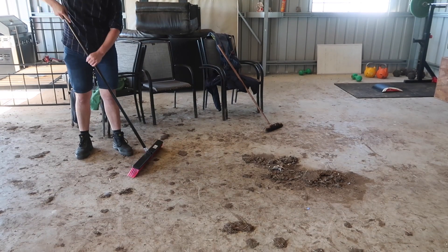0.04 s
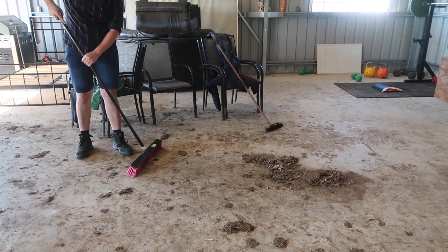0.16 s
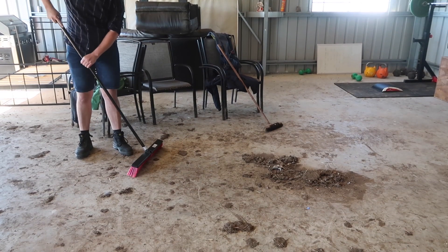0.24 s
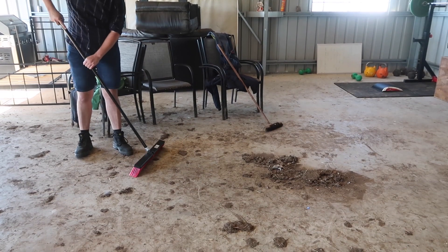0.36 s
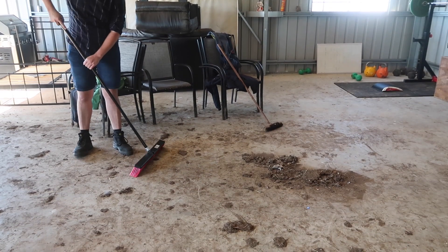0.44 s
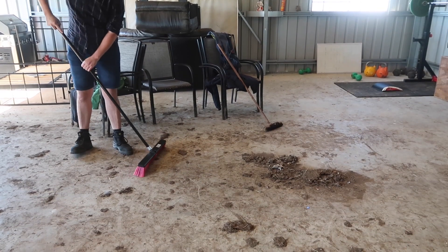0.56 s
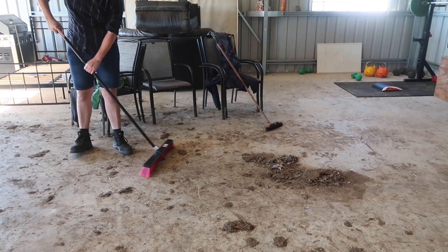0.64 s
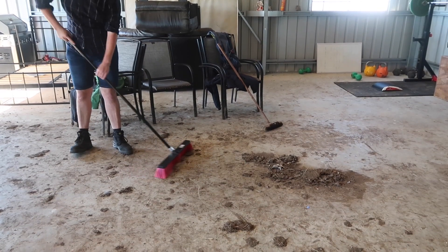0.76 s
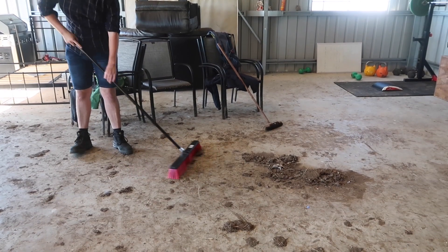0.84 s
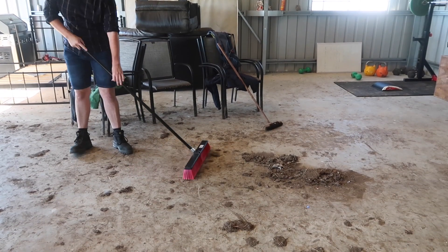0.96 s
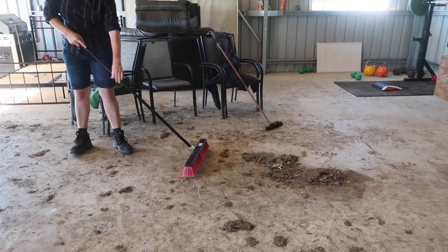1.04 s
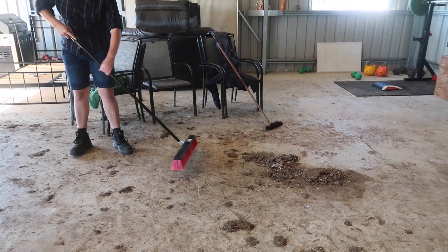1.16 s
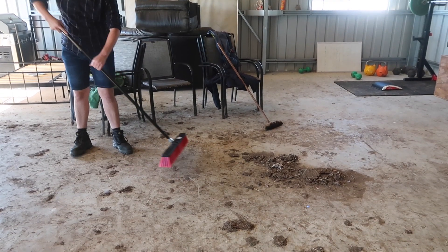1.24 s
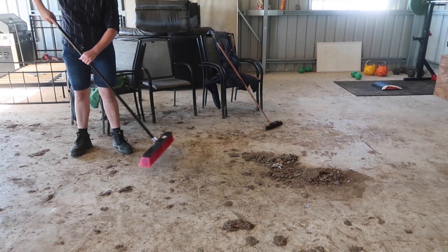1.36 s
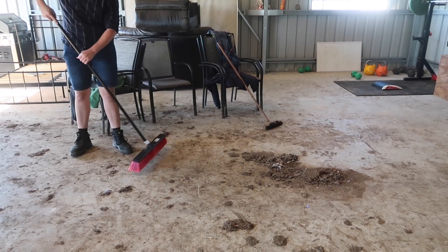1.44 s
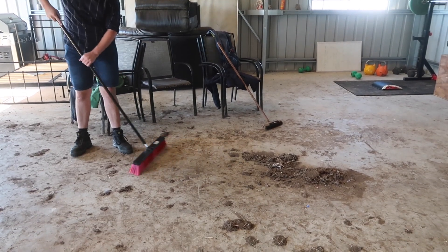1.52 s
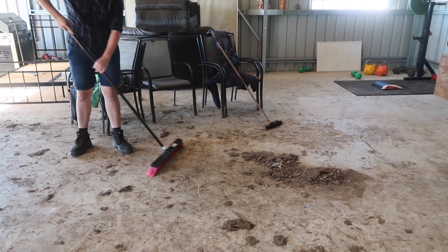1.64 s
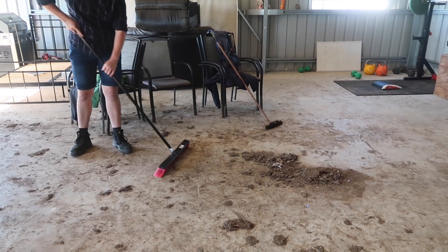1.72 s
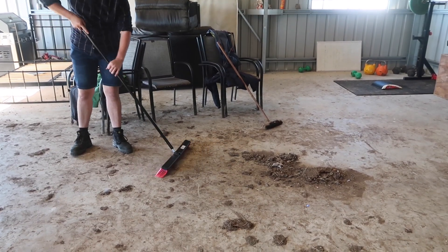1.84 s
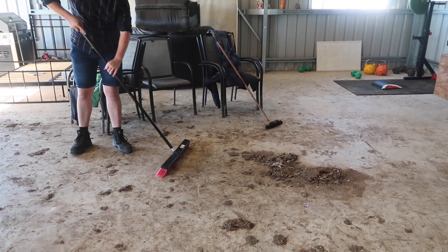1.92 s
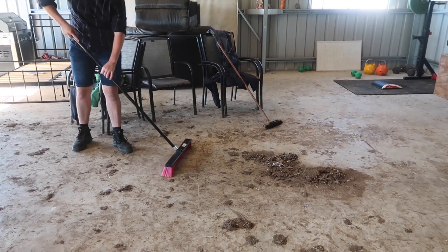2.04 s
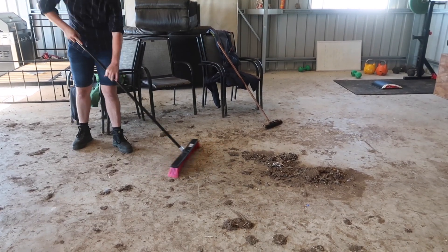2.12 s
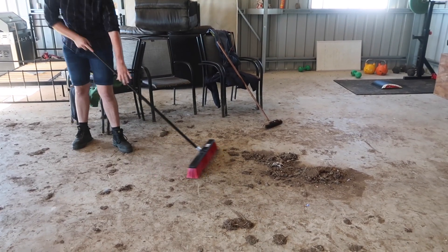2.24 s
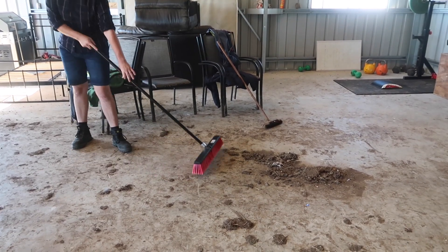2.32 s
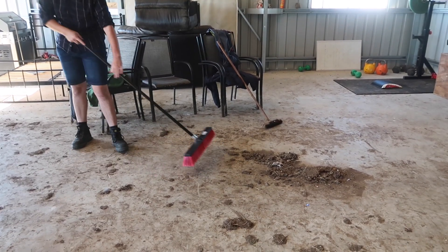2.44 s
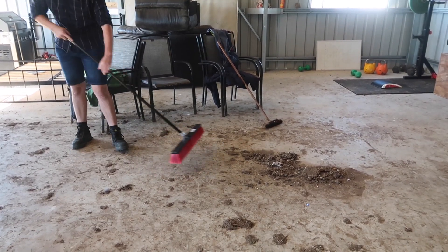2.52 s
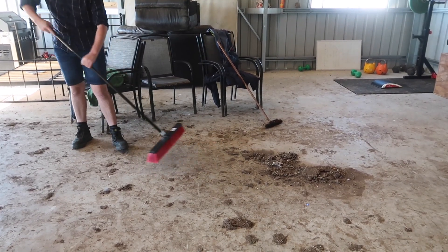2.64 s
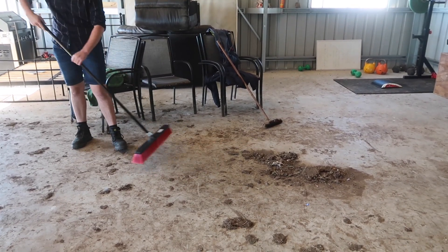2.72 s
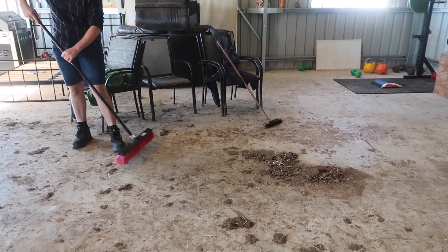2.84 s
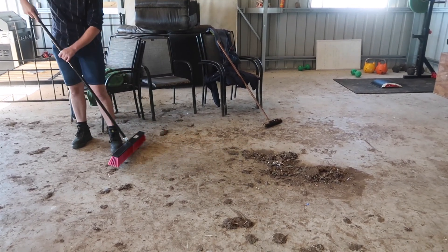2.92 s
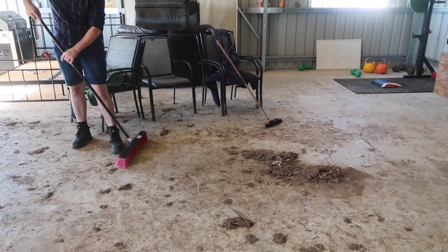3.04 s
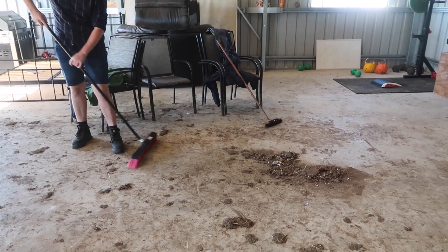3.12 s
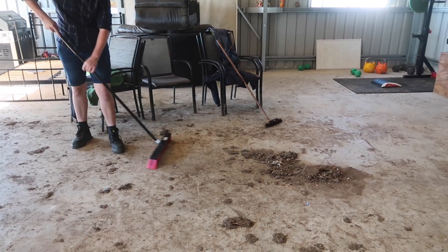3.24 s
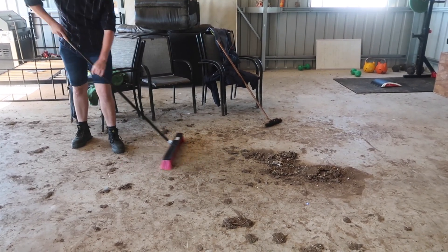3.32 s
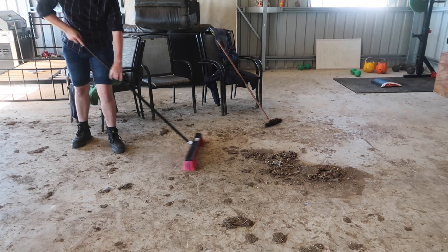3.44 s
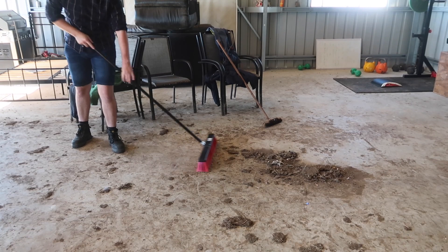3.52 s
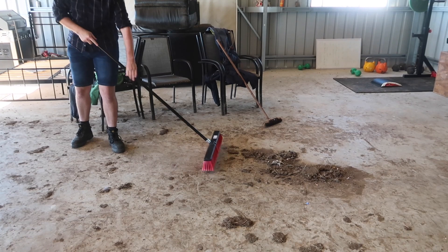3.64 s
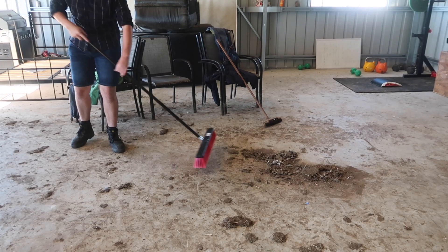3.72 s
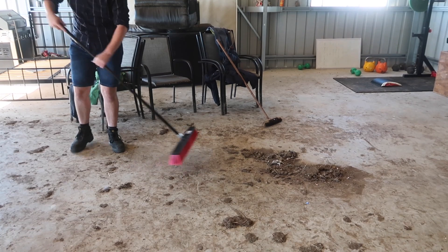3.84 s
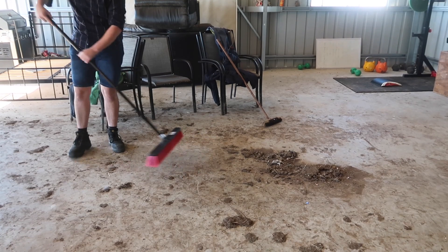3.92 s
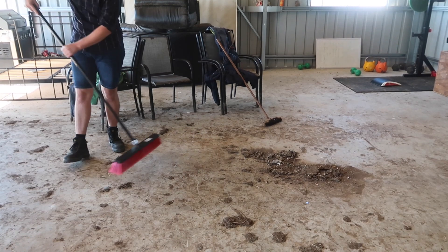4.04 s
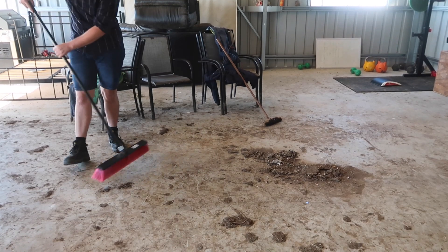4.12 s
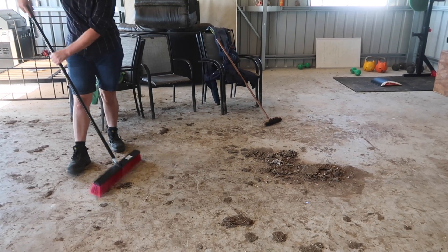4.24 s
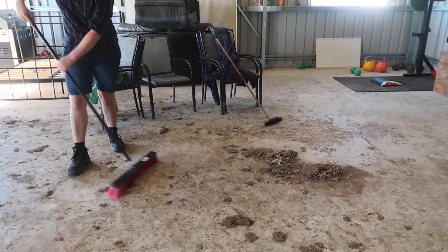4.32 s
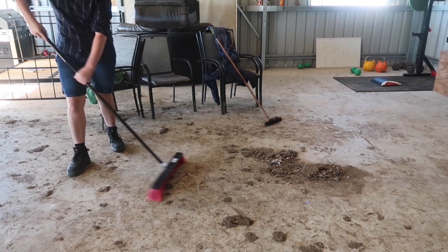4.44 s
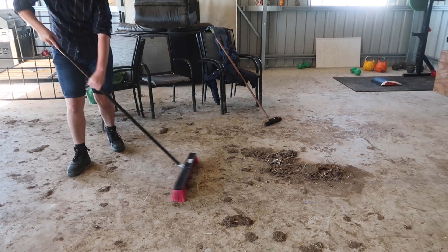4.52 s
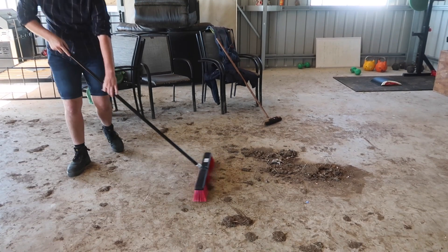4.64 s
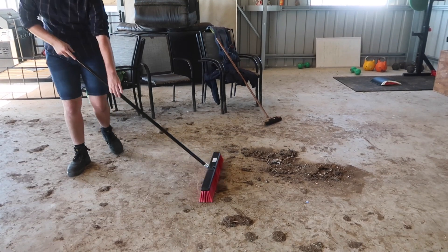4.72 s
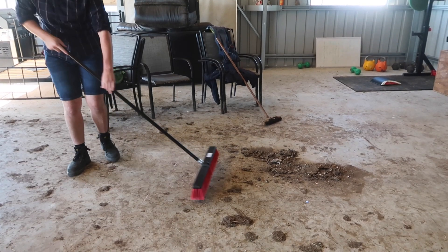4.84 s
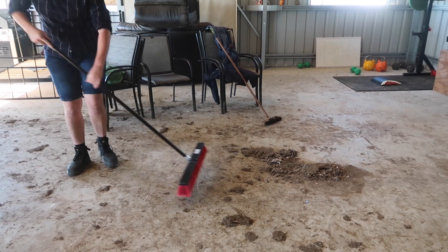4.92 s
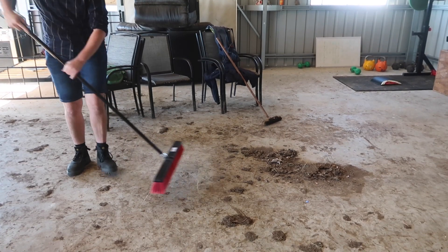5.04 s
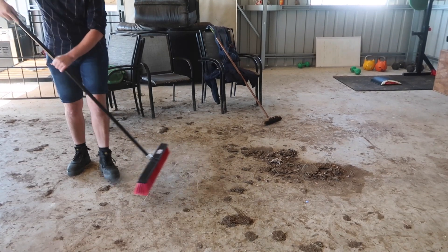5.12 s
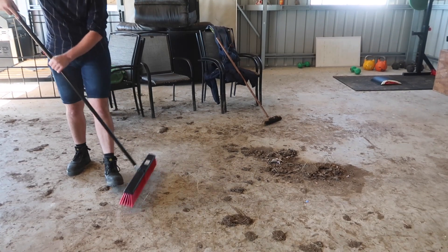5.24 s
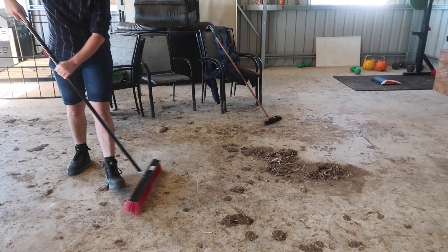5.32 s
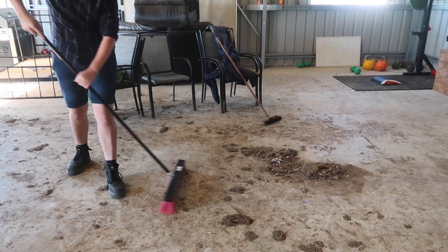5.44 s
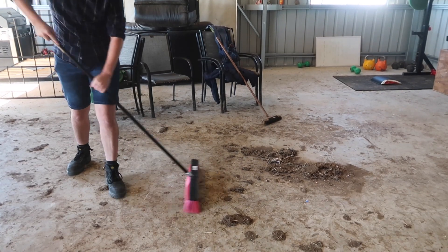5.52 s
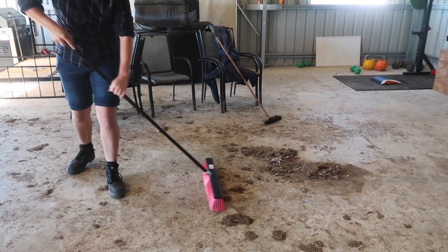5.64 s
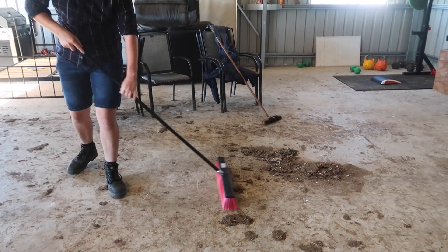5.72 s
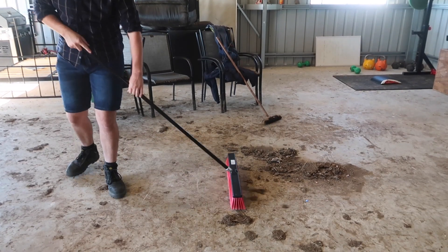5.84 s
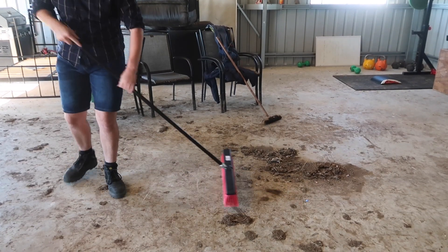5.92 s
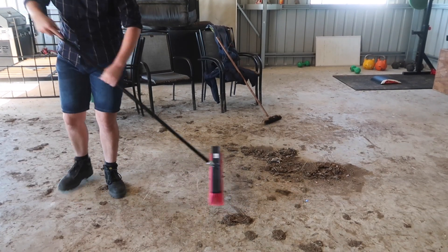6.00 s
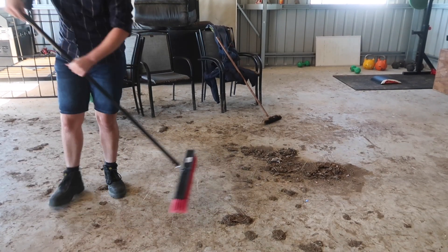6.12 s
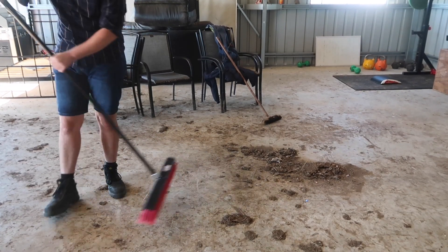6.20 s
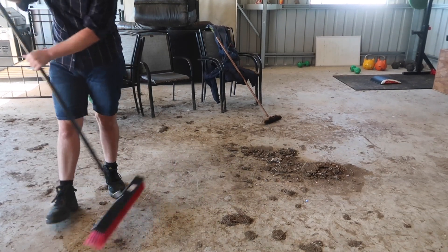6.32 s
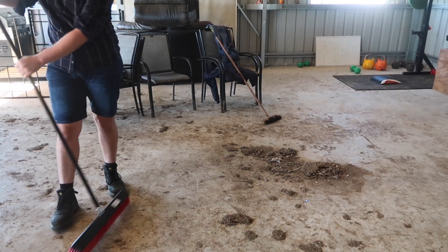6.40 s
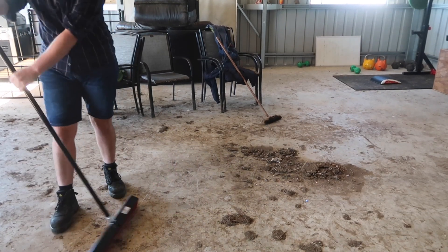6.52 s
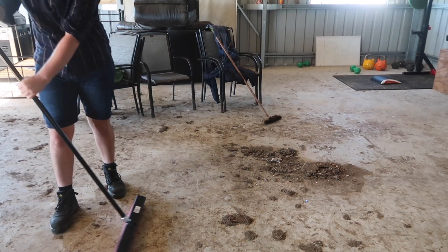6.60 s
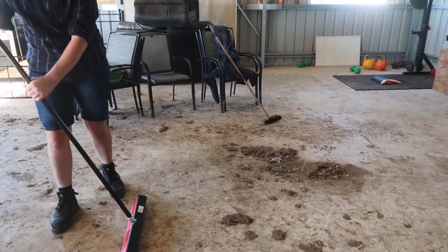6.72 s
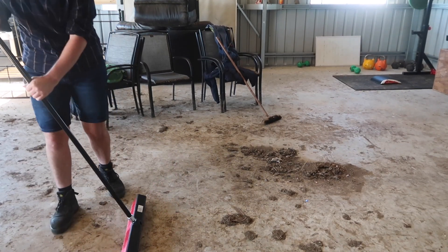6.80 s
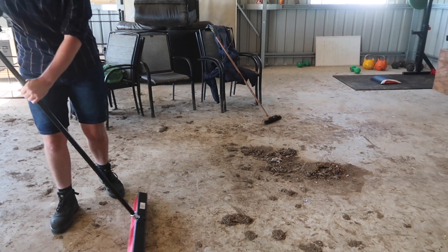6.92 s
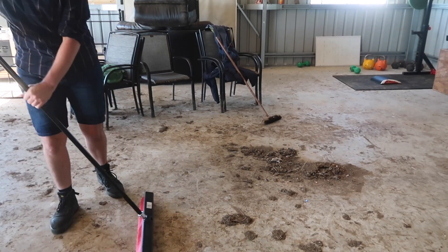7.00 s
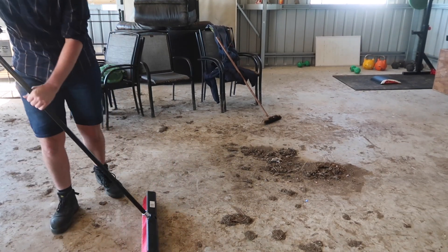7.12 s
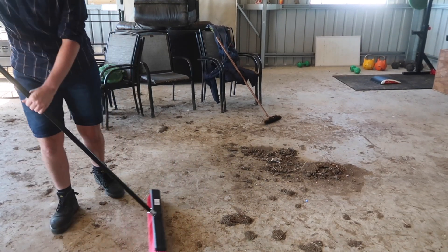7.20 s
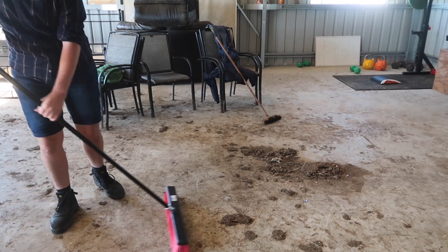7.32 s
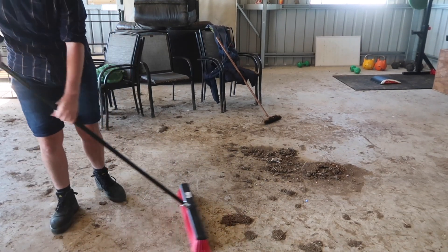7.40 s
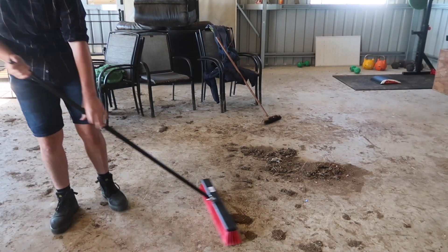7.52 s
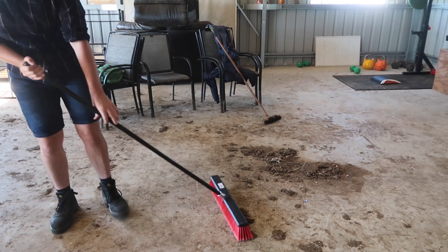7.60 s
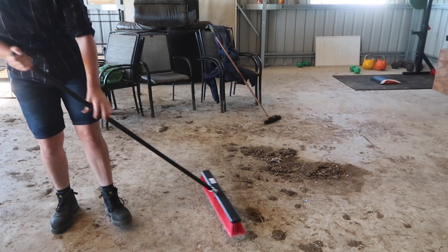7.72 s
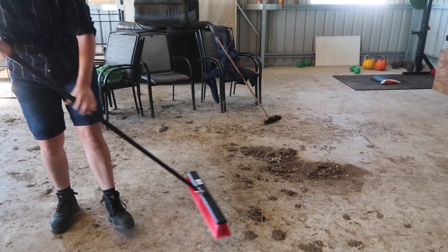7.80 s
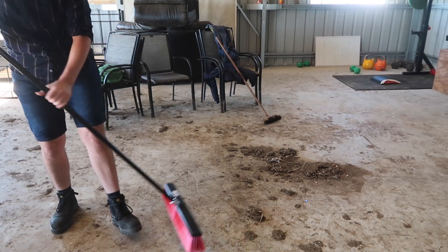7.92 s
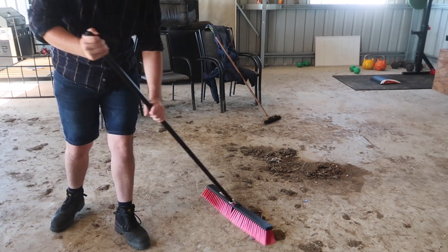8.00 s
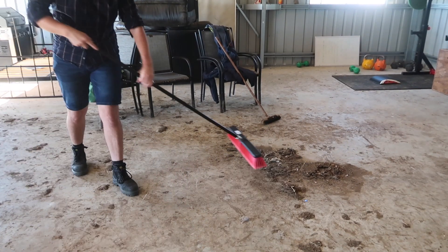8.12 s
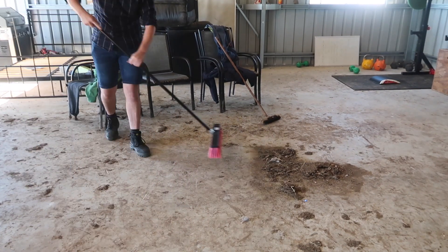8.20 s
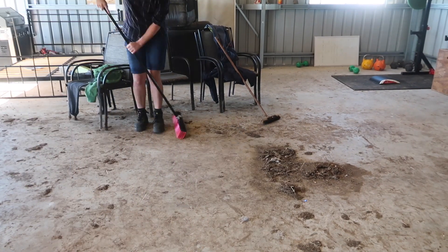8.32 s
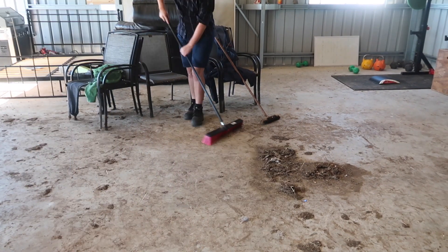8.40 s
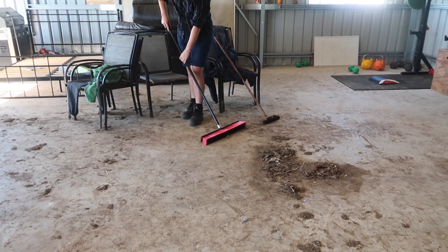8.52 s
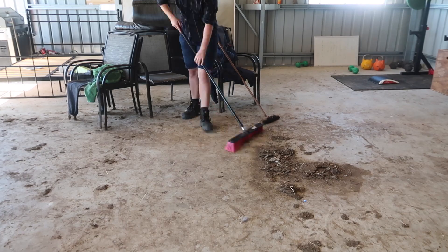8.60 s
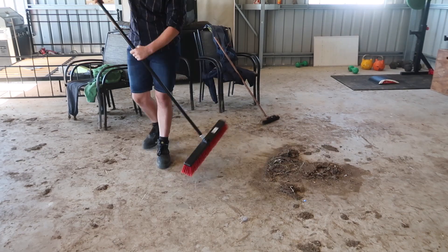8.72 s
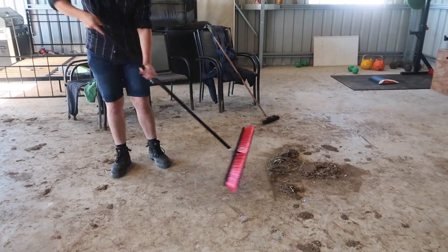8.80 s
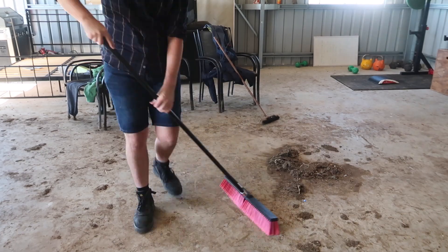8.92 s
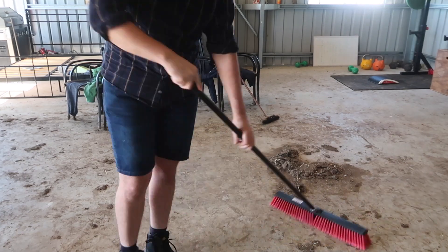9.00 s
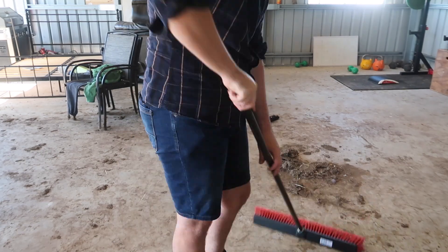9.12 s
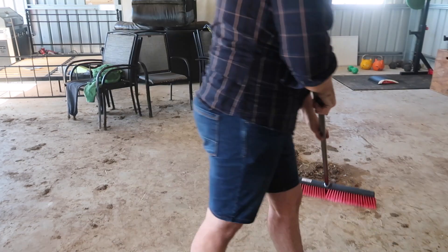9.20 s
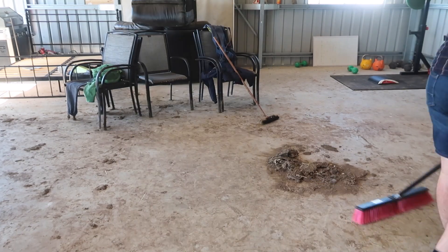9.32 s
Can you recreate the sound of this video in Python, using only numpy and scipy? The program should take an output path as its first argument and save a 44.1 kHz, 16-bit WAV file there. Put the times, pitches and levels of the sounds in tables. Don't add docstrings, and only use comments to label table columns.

```python
import sys
import numpy as np
from scipy import signal
from scipy.fft import rfft, irfft
from scipy.io import wavfile
from scipy.ndimage import uniform_filter1d

SR = 44100
rng = np.random.default_rng(int(sys.argv[2]) if len(sys.argv) > 2 else 0)


def undo_db(level):
    steps = np.asarray(level, float) / 20
    return 10 ** steps


def wrap_up_sound(samples):
    columns = np.atleast_2d(samples).T
    tamed = np.clip(columns, -1, 1)
    steps = np.round(tamed * 32767).astype(np.int16)
    wavfile.write(sys.argv[1], SR, steps)


N = 412731
FAST_FROM_S = 8.0


def rms_one(x):
    return x / np.sqrt(np.mean(x ** 2) + 1e-20)


def at_hz(points, hz):
    table_hz, values = np.transpose(points)
    return np.interp(np.log(hz + 1), np.log(table_hz), values)


def colour(x, spectrum):
    size = 8192
    bins_hz = np.arange(size // 2 + 1) * SR / size
    cepstrum = irfft(np.log(undo_db(at_hz(spectrum, bins_hz))))
    cepstrum[1:size // 2] *= 2
    cepstrum[size // 2 + 1:] = 0
    response = irfft(np.exp(rfft(cepstrum)))
    return rms_one(signal.oaconvolve(x, response)[:N])


def drift(rate):
    r = np.exp(-80 * np.pi * rate / SR)
    chance = rng.standard_normal(N // 40 + 2002)
    slow = signal.lfilter([1], [1, -2 * r, r * r], chance)[2000:]
    return np.interp(np.arange(N) / 40, np.arange(len(slow)), rms_one(slow))


def ring(x, hz, t60):
    r, w = undo_db(-60 / (t60 * SR)), 2 * np.pi * hz / SR
    return signal.lfilter([0, np.sin(w)], [1, -2 * r * np.cos(w), r * r], x + 1e-18)


def place(out, sound, at, peak_db):
    out[at:at + len(sound)] += undo_db(peak_db) * sound / np.abs(sound).max()


def sweeping():
    bristle_db, bright_db, head_db, body_db, deep_db = controls()
    springy = np.clip((bright_db + 21.) / 11.2, 0, 1)
    heavy_head = np.clip((head_db - bristle_db + 5.5) / 9.2, 0, 1)
    heavy_body = np.clip((body_db + 43.0) / 6.0, 0, 1)
    gains = undo_db([bristle_db, bristle_db + bright_db, head_db, body_db - 3.5, deep_db - 0.5])
    bristle, hiss, head, body, deep = uniform_filter1d(gains, size=30, axis=1)
    front, side = bristles(bristle, hiss, springy)
    front += head * wooden_head(heavy_head)
    front += body * handle(heavy_body)
    front += deep * deep_rumble()
    return front, side


def flicks(per_s, spread_db, clump_db):
    sizes = undo_db(spread_db * np.minimum(rng.exponential(1, N), 5)) * rng.choice([-1, 1], N)
    lets_go = rng.random(N) < per_s / SR
    return sizes * lets_go * undo_db(clump_db * drift(18.6))


# pitch_hz, level_db (per Hz)
FLICK_TONE = [(900, -41), (1300, -7), (1700, -3.5), (3100, 1.5), (4000, -1.5), (4700, -2), (5800, -12),
              (7500, -29.5), (12000, -69.5)]
# pitch_hz, level_db (per Hz)
DRAG_TONE = [(900, -36.5), (1400, -13), (1650, 5.5), (2600, 3.5), (3300, -1.5), (4200, -12.5), (6000, -42),
             (12000, -70)]
# pitch_hz, level_db (per Hz)
HISS_TONE = [(3500, -25), (5600, -3.5), (6500, -2.5), (8000, -4), (10500, -7.5), (13000, -13), (15500, -17),
             (16500, -56)]
# pitch_hz, level_db (per Hz)
SIDE_HISS_TONE = [(100, -44), (400, -36), (900, -41), (2200, -46), (3300, 2.5), (4700, 8.5), (7500, 4),
                  (11500, 5.5), (15500, -3.5), (16500, -66)]


def bristles(bristle, hiss, springy):
    near, flat, far = flicks(11000., 1.67, 0.92), flicks(9000., 4.2, 0.99), flicks(14000., 2.9, 0.84)
    upright = colour(near, FLICK_TONE) + singing(far)
    dragged = colour(flat, DRAG_TONE)
    front = bristle * (np.sqrt(springy) * upright + np.sqrt(1 - springy) * dragged)
    front += undo_db(-0.2) * hiss * colour(near, HISS_TONE)
    return front, undo_db(5.0) * hiss * colour(far, SIDE_HISS_TONE)


# start_s, end_s
PUSH_SPANS = [
    (0, 1.556),
    (1.557, 3.021),
    (3.022, 4.292),
    (4.293, 5.298),
    (5.299, 6.485),
    (6.486, 7.14),
    (7.141, 8),
]
# pitch_hz, share_db
PUSH_PITCHES = [(3260, -15), (3300, -17), (3170, -11.5), (3070, -25), (3440, -28), (2600, -21),
                (3500, -4.5)]


def singing(x):
    out = np.zeros(N)
    for (start, end), (hz, share_db) in zip(PUSH_SPANS, PUSH_PITCHES):
        span = slice(round(start * SR), round(end * SR))
        sung = ring(ring(x[span], hz, 12. / hz), hz, 12. / hz)
        out[span] = undo_db(share_db) * rms_one(sung)
    return out


# pitch_hz, level_db (per Hz)
RATTLE_TONE = [(250, -21), (420, -6), (600, 0), (900, -1), (1250, 5), (1600, -5.5), (2400, -17),
               (6000, -58)]
# pitch_hz, level_db (per Hz)
KNOCK_TONE = [(250, -13.5), (420, -2.5), (800, -4.5), (1500, -5.5), (6000, -73)]


def wooden_head(heavy):
    rattle = flicks(3000., 2.1, 0.44)
    return (1 - heavy) * colour(rattle, RATTLE_TONE) + heavy * colour(rattle, KNOCK_TONE)


# pitch_hz, level_db (per Hz)
WOOD_TONE = [(60, -33), (130, -13.5), (180, -8), (215, -5), (255, 1.5), (300, 0), (420, -1), (700, -31),
             (3000, -97)]
# pitch_hz, level_db (per Hz)
SLAM_TONE = [(60, -30), (120, -5), (230, 0.5), (400, -1.5), (700, -13.5), (1500, -69)]
# pitch_hz, width_hz, level_db
HANDLE_BENDS = [
    (221, 43, -3.5),
    (293, 160, -6.5),
]


def handle(heavy):
    bend_share = 0.57
    shake = flicks(1500., 1.7, 1.9)
    wood = colour(shake, WOOD_TONE)
    bends = 0
    for hz, width, db in HANDLE_BENDS:
        bends = bends + undo_db(db) * rms_one(ring(wood, hz, 2.0 / max(width, 12)))
    hum = bend_share * rms_one(bends) + (1 - bend_share) * wood
    return (1 - heavy) * rms_one(hum) + heavy * colour(shake, SLAM_TONE)


# pitch_hz, level_db (per Hz)
RUMBLE_TONE = [(15, -18), (40, -6.5), (70, -7), (95, -2.5), (120, -5.5), (160, -9.5), (1000, -110)]


def deep_rumble():
    return colour(rng.standard_normal(N), RUMBLE_TONE)


def controls():
    t = np.arange(N) / SR
    coarse = t[::32]
    smooth = [np.interp(t, coarse, row) for row in 10 * np.log10(slow_work(coarse))]
    held = 10 * np.log10(quick_work())
    deep_db = np.minimum(held[3] - 2.5, -48.) + 0.5 * (held[3] + 52)
    bristle_db, hiss_db, *low = np.where(t < FAST_FROM_S, smooth, [*held, deep_db])
    return bristle_db, hiss_db - bristle_db, *low


def swell(t, start, full, lift, level_db, rise_db, gain_db_per_s, loss_db_per_s):
    rise = np.clip((full - t) / max(full - start, 1e-3), 0, 4)
    db = level_db - rise_db * rise ** 1.04 - gain_db_per_s * np.clip(lift - t, 0, lift - full)
    return undo_db(2 * (db - np.multiply.outer(loss_db_per_s, np.maximum(t - lift, 0))))


# level_db of bristles, hiss, head, handle
REST_LEVELS = [-67.5, -80.5, -65.5, -70]
# time_s, level_db
TRAFFIC_SWELL = [(0.0, -72), (.6, -71), (2.0, -71.5), (3.0, -74.5), (3.7, -71), (3.9, -63.5), (4.3, -64),
                 (5.1, -68), (5.28, -58), (6.4, -62), (8.0, -60)]


def slow_work(t):
    traffic_db = np.interp(t, *np.transpose(TRAFFIC_SWELL))
    power = undo_db(2 * np.array([*[db + 0 * t for db in REST_LEVELS], traffic_db]))
    power[:3] += pushes(t) + landings(t)
    power[2:] += hums(t)
    return power


# touch_s, full_speed_s, lift_s, level_db (at lift), brightness_db
STROKES = [(-.19, -.1, 0.018, -47, -14.5), (0.192, 0.343, 0.35, -50, -12.5), (0.53, 0.71, 0.96, -32, -9.5),
           (1.556, 1.713, 1.744, -33.5, -8.5), (1.966, 2, 1.96, -38, -19),
           (2.05, 2.089, 2.206, -28.5, -18.5), (2.14, 2.242, 2.264, -34.5, -6),
           (2.837, 2.857, 2.2, -56, -30), (3.093, 3.218, 3.555, -30.5, -7.5),
           (4.27, 4.46, 4.7, -29.5, -9.5), (5.304, 5.53, 5.782, -31, -8.5), (6.513, 6.636, 6.7, -37, -8.5),
           (6.79, 6.848, 6.92, -47.5, -32), (6.86, 6.962, 7.075, -41.5, -11),
           (7.077, 7.367, 7.59, -32, -10.5)]
# loss_db_per_s of bristles, hiss, head
LIFT_LOSSES = [88.5, 97, 70]


def pushes(t):
    rise_db, lean_db_per_s, rounding_s = 20, 6.5, 0.059
    dust_db, dust_loss_db_per_s = [[-23], [-27], [-23]], 38
    pushed = np.zeros((3, len(t)))
    for touch, full, lift, level_db, bright_db in STROKES:
        head_db = -15 - 0.32 * (bright_db + 7)
        shares = undo_db(2 * np.array([[0], [bright_db], [head_db]]))
        shape = swell(t, touch, full, lift, level_db, rise_db, lean_db_per_s, LIFT_LOSSES)
        dust = swell(t, full, lift, lift, level_db, rise_db, 0, dust_loss_db_per_s)
        down = min([s for s, *rest in SET_DOWNS if full - .25 < s < full], default=-1)
        audible = t > down + rounding_s / 2
        pushed += audible * shares * (shape + undo_db(2 * np.array(dust_db)) * dust)
    return uniform_filter1d(pushed, round(rounding_s / (t[1] - t[0])), axis=1)


CRUSH_BRIGHT_DB = -19
# start_s, bristle_db, head_db, loss_db_per_s
SET_DOWNS = [(-.2, -72, -48, 17), (2.866, -69, -53.5, 18), (7.47, -60, -44.5, 57), (1.556, -32, -34.5, 123),
             (3.022, -40, -47, 150), (3.04, -43.5, -42, 66), (4.294, -37, -38, 502), (4.317, -38, -36, 102),
             (5.3, -42, -33, 49), (5.355, -31, -29, 82), (6.485, -32.5, -35.5, 105), (6.503, -32, -29, 597),
             (6.42, -58, -53.5, 150.5), (6.82, -53, -49, 57)]


def landings(t):
    crush_s = 0.0034
    power = np.zeros((3, len(t)))
    for s, bristle_db, head_db, dying in SET_DOWNS:
        shares = undo_db(2 * np.array([[bristle_db], [bristle_db + CRUSH_BRIGHT_DB], [head_db]]))
        power += shares * swell(t, s, s + crush_s, s + crush_s, 0, 26, 0, dying) * (t >= s)
    return power


# start_s, rise_s, level_db, loss_db_per_s, deep_share_db
LOADS = [(.05, 0.06, -67, 40, -9), (.54, 0.027, -54, 200, -20), (.665, 0.007, -43.5, 29, -34),
         (1.558, 0.0036, -41, 65, -29), (2.07, 0.027, -47, 27, -18), (3.022, .003, -55, 48, -9),
         (3.61, .02, -60, 120, -11), (4.315, 0.024, -35.5, 280, -23), (4.37, .02, -54, 15, -1),
         (5.299, 0.018, -23.5, 6, -19), (5.55, 0.11, -35, 65, -7.5), (5.75, 0.018, -45, 16, -2),
         (6.478, 0.041, -36.5, 94, -11), (6.8, 0.03, -38.5, 69, -12.5), (6.97, 0.097, -43.5, 53, -13),
         (7.55, 0.11, -54.5, 31, -3)]


def hums(t):
    in_head_db, blow_ends_s, blow_loss_db_per_s = -12.5, 5.42, 66
    power = np.zeros((3, len(t)))
    for s, rise, level_db, dying, deep_db in LOADS:
        shape = swell(t, s, s + rise, s + rise, level_db, 16.0, 0, dying) * (t >= s)
        if s < blow_ends_s < s + .2:
            shape = shape * undo_db(-2 * blow_loss_db_per_s * np.maximum(t - blow_ends_s, 0))
        power += undo_db(2 * np.array([[in_head_db], [0], [deep_db]])) * shape
    return power


# level_db of bristles, hiss, head, rumble
QUICK_REST = [-59.5, -78.5, -56.5, -55]
# start_s, end_s, level_db
PUSH_SLICES = [(8.0373, 8.084, -36.5), (8.09, 8.097, -54), (8.135, 8.169, -41), (8.169, 8.178, -55),
               (8.2063, 8.2137, -33.5), (8.2164, 8.253, -31.5), (8.289, 8.335, -32), (8.333, 8.338, -47),
               (8.387, 8.427, -34.5), (8.423, 8.455, -48), (8.457, 8.47, -42), (8.6, 8.596, -56),
               (8.6376, 8.6867, -34), (8.701, 8.718, -50), (8.718, 8.724, -45), (8.727, 8.735, -44.5),
               (8.735, 8.76, -54), (8.854, 8.87, -52), (8.87, 8.885, -65), (8.892, 8.916, -37),
               (8.915, 8.942, -42), (8.943, 8.976, -36.5), (8.972, 8.995, -45), (9.0125, 9.018, -34.5),
               (9.023, 9.058, -32.5), (9.057, 9.071, -37.5), (9.228, 9.28, -35.5), (9.28, 9.314, -39.5),
               (9.315, 9.363, -34)]
# start_s, end_s, bristle_db, head_db, rumble_db
LANDING_SLICES = [(8.015, 8.033, -47.5, -48.5, -67), (8.121, 8.137, -49, -59, -54),
                  (8.27, 8.278, -37, -51, -48), (8.278, 8.29, -47, -46, -56),
                  (8.5126, 8.518, -34, -37, -37), (8.555, 8.594, -30, -30.5, -38),
                  (8.601, 8.604, -36, -26.5, -43), (8.632, 8.639, -38, -41, -37),
                  (8.713, 8.737, -55, -47.5, -52), (8.8086, 8.857, -32, -33, -38.5),
                  (9.0993, 9.11, -32.5, -30.5, -37), (9.1084, 9.144, -30.5, -29.5, -30),
                  (9.143, 9.195, -37, -37.5, -41), (9.19, 9.229, -50.5, -51, -56),
                  (9.231, 9.273, -53, -48.5, -27)]


def quick_work():
    bright_db, head_db = -9, -12
    power = undo_db(2 * np.array(QUICK_REST))[:, None] * np.ones(N)
    slices = []
    for s, end, db in PUSH_SLICES:
        slices.append((s, end, db, db + bright_db, db + head_db, 0.27 * db - 42.0))
    for s, end, db, *rest in LANDING_SLICES:
        slices.append((s, end, db, db + CRUSH_BRIGHT_DB + 0.5, *rest))
    for s, end, *levels in slices:
        power[:, round(s * SR):round(end * SR)] += undo_db(2 * np.array(levels))[:, None]
    return power


# start_s, top_db
TOP_FADES = [(0, 4), (0.55, 5), (1.556, 5), (2.05, 4), (3.022, 5), (4.293, 2), (5.299, 2), (6.486, 2),
             (6.86, -2), (7.2, 5), (8, 1)]


def dulling_top(front):
    top_hz, dulls_db_per_s = 11300, 9
    t = np.arange(N) / SR
    starts, top_db = np.transpose(TOP_FADES)
    push = np.searchsorted(starts, t, "right") - 1
    gain = undo_db(top_db[push] - dulls_db_per_s * (t - starts[push]) * (t < FAST_FROM_S))
    top = signal.sosfiltfilt(signal.butter(4, top_hz, "high", fs=SR, output="sos"), front)
    return front + (gain - 1) * top


# start_s, peak_db, pitch_hz, t60_s
HEAD_TAPS = [(1.5562, -27, 2000, 0.03), (1.5603, -14.5, 2420, 0.02), (1.565, -22, 2630, 0.03),
             (1.5663, -24, 1470, 0.032), (1.575, -19.5, 1350, 0.034), (1.5819, -22, 1480, 0.069),
             (1.99, -27, 2000, 0.039), (2.0677, -31, 2000, 0.035), (3.0405, -30, 1800, 0.015),
             (3.0435, -20.5, 1600, 0.017), (3.046, -25, 2200, 0.013), (3.061, -29, 605, 0.01),
             (4.2938, -27, 2600, 0.03), (4.299, -30, 955, 0.015), (4.3195, -20, 2140, 0.03),
             (4.338, -32, 1100, 0.03), (4.345, -32, 1504, 0.031), (5.3575, -20, 3300, 0.022),
             (5.3592, -16.5, 3380, 0.016), (5.3617, -20, 1510, 0.03), (5.369, -18, 3300, 0.028),
             (5.3707, -24, 4070, 0.014), (5.3726, -20, 1500, 0.029), (6.4853, -23.5, 2830, 0.029),
             (6.4904, -19, 1900, 0.025), (6.4943, -25, 1990, 0.023), (6.4975, -23, 2720, 0.016),
             (6.5065, -17.5, 2200, 0.012), (6.5098, -28, 1800, 0.013), (6.5148, -23, 810, 0.02),
             (6.523, -27, 810, 0.016), (9.109, -34, 1500, 0.02), (9.188, -16.5, 1240, 0.015),
             (8.6004, -26, 1490, 0.006)]


def taps():
    size = 6000
    out, t = np.zeros(N + size), np.arange(size) / SR
    noises = rng.standard_normal((len(HEAD_TAPS), size))
    for (s, peak_db, hz, t60), noise in zip(HEAD_TAPS, noises):
        burst = noise * undo_db(-60 * t / max(t60, .005))
        wide = ring(ring(burst, hz, 2.8 / hz), hz, 2.8 / hz)
        tap = rms_one(ring(burst, hz, 14. / hz)) + .6 * rms_one(wide)
        tap = signal.lfilter([1], [1, -0.6], np.diff(tap, prepend=0))
        place(out, tap, round(s * SR), peak_db - 4.0)
    return out[:N]


# start_s, peak_db, pitch_hz, spread_octaves
PEBBLES = [(2.4677, -30, 3100, .4), (2.4955, -37, 2900, .4), (2.5025, -38, 2300, .4),
           (2.5065, -34, 3200, .4), (2.508, -32, 3200, .4), (2.5176, -25, 2600, .55),
           (2.8025, -38, 2700, .9), (2.8223, -38, 2600, .9), (2.8247, -32, 2300, .9),
           (2.8274, -36, 2400, .9), (2.8403, -41, 2500, .9), (2.8417, -30, 2500, .9),
           (2.8546, -34, 2300, .9), (2.857, -32, 2400, .9), (2.8602, -25, 2300, .8), (2.862, -30, 2100, .6),
           (2.8645, -34, 2500, .9), (2.871, -36, 2000, .6), (3.0235, -38, 2600, .9),
           (3.0262, -32, 1700, .6), (3.0276, -27, 2300, .9), (3.0315, -34, 1700, .5),
           (2.1005, -20, 2400, .6), (2.1025, -20, 2600, .6), (2.1158, -20, 2900, .5),
           (6.3746, -41, 2000, .7), (6.382, -41, 3000, .6), (6.386, -45, 2600, .6), (6.4185, -40, 2200, .7),
           (6.4213, -40, 2000, .4), (6.4303, -40, 2000, .4), (6.463, -43, 3000, .5),
           (4.2958, -25, 2700, .5), (4.2977, -26, 2700, .5), (4.3202, -21, 2400, .5),
           (4.3258, -23, 2300, .6), (4.3378, -22, 1500, .9), (8.734, -36, 2500, .9),
           (7.9688, -40, 2360, .7)]


def grit():
    size = 1200
    out, t = np.zeros(N + size), np.arange(size) / SR
    noises = rng.standard_normal((len(PEBBLES), size))
    for (s, peak_db, hz, spread), noise in zip(PEBBLES, noises):
        edges_hz = hz * 2. ** np.array([-spread, spread])
        band = signal.butter(2, edges_hz, "band", fs=SR, output="sos")
        contact = (t == 0) * np.sign(noise[0]) + .09 * noise * undo_db(-60 * t / .008)
        click = signal.sosfilt(np.vstack([band, band]), contact)
        place(out, click, round(s * SR) - np.abs(click).argmax(), peak_db)
    return out[:N]


# start_s, peak_db, pitch_hz, t60_s, ring_cycles
SCRAPES = [(2.868, -43, 1210, 0.2, 8), (2.868, -42, 1600, 0.7, 9), (2.87, -39.5, 2150, 0.8, 9),
           (2.87, -50, 3300, 0.5, 5), (7.46, -39.5, 562, 0.56, 12), (7.54, -37, 665, 0.25, 12),
           (6.82, -44, 398, 0.45, 14), (6.82, -42, 840, 0.36, 16), (0.75, -49, 390, 0.2, 16),
           (2.225, -38, 4500, 0.3, 20), (2.07, -41, 580, 0.65, 14), (6.415, -46, 2050, 0.04, 8),
           (6.4295, -42, 2200, 0.03, 12), (6.46, -50, 1720, 0.06, 6), (6.374, -47, 2500, 0.06, 4)]


def scuffs():
    size = 12000
    out, t = np.zeros(N + size), np.arange(size) / SR
    noises = rng.standard_normal((len(SCRAPES), size))
    for (s, peak_db, hz, t60, cycles), noise in zip(SCRAPES, noises):
        rasp = noise * undo_db(-60 * t / max(t60, .01))
        rasp = ring(ring(rasp, hz, cycles / hz), hz, cycles / hz)
        place(out, rasp, round(s * SR), peak_db)
    return out[:N]


# start_s, peak_db, pitch_hz
BLOW_HITS = [
    (5.301, -18.5, 203),
    (5.317, -19, 350),
    (5.333, -20, 145),
    (5.358, -21, 600),
    (5.375, -19.5, 268),
    (5.388, -28, 780),
    (5.399, -23, 110),
    (5.408, -23.5, 280),
    (5.424, -26, 400),
]
# pitch_hz, level_db, t60_s
WALL_MODES = [(76, -12, 0.57), (90.4, -6.5, 2.54), (94.9, -11, 2.15), (108.6, 0.5, 0.52), (140, 7, 0.35),
              (187, -3, 0.3), (267, -11, 1.3), (280.5, -8, 1.35), (354, -6, 0.26), (407, -17, 0.3),
              (468.5, -11, 0.3), (565, -10, 0.73), (696, -14, 0.33), (790, -1, 0.28)]


def boom():
    off_pitch_db_per_octave, flutter_db, flutters_per_s = 5.5, 4.0, 7.0
    s, peak_db, pitch = np.transpose(BLOW_HITS)
    out = np.zeros(N)
    for hz, level_db, t60 in WALL_MODES:
        off_db = off_pitch_db_per_octave * np.abs(np.log2(hz / pitch))
        clicks = np.zeros(N)
        strengths = undo_db(peak_db + level_db - 7.0 - off_db)
        clicks[(s * SR).astype(int)] = strengths * rng.choice([-1, 1], len(s))
        flutter = undo_db(flutter_db * np.clip(drift(flutters_per_s), -2, 1))
        out += ring(clicks, hz, t60) * flutter
    return signal.sosfilt(signal.butter(2, 1200., fs=SR, output="sos"), out)


# pitch_hz, t60_s
SHED_DECAY = [(100, 0.61), (1000, 1), (4000, 1), (8000, 0.74), (12000, 0.46)]


def shed(x):
    t, tail = np.arange(SR) / SR, 0
    for low in 45 * 2. ** np.arange(9):
        band = signal.butter(2, [low, min(2 * low, .45 * SR)], "band", fs=SR, output="sos")
        noise = signal.sosfilt(band, rng.standard_normal(SR))
        tail = tail + noise * undo_db(-60 * t / at_hz(SHED_DECAY, 3.0 * low))
    tail *= np.clip(t / 0.0047, 0, 1)
    return signal.fftconvolve(x, tail / np.sqrt(np.sum(tail ** 2)))[:N]


# start_s, peak_db
MOTOR_TICKS = [(1.2481, -43), (1.3099, -48), (1.3678, -48), (1.4067, -54), (1.4247, -46), (1.4476, -51),
               (1.475, -48), (1.527, -48), (1.5442, -50), (6.1684, -51), (6.185, -47), (6.2085, -49),
               (6.2885, -50), (6.3523, -48), (6.4078, -45.5), (6.4482, -53), (6.4712, -53)]


def lens_motor():
    tick_s, tick_db = np.transpose(MOTOR_TICKS)
    ticks = np.zeros((2, N))
    ticks[:, np.round(tick_s * SR).astype(int)] = undo_db(tick_db + [[.3], [2.5]])
    stray = (rng.random(N) < 12. / SR) * rng.normal(0, 1, N)
    ticks[1] += undo_db(-47.0) * stray
    loose = np.clip(.5 + .5 * drift(9.0), 0, 1)
    whine = colour(rng.standard_normal(N), [(12800, -50), (13050, -4), (13300, -66)])
    whine = undo_db(-86 + 2.3 * drift(3.3)) * whine * [[.7], [1]]
    return ring(ticks * (1 - 0.37 * loose), 4150, 0.016) + ring(ticks * loose, 3700, 0.01) + whine


# pitch_hz, level_db (per Hz)
AIR_TONE = [(25, -21), (60, -26), (100, -19.5), (300, -2.5), (1000, -9), (2500, -13.5), (5000, -23),
            (12000, -34), (15500, -40), (16500, -76)]
# pitch_hz, level_db (per Hz)
SIDE_AIR_TONE = [(40, -68), (200, -38), (380, -10), (2000, -3), (4300, -7), (9000, -17), (13000, -30),
                 (15500, -45), (16500, -80)]
# time_s, level_db
OUTSIDE_SWELL = [(0.0, -86), (3.7, -80), (4.0, -72), (5.2, -62.5), (6.0, -65), (7.9, -66), (8.0, -62),
                 (8.5, -60), (9.36, -58)]
# pitch_hz, level_db (per Hz)
OUTSIDE_TONE = [(30, -34), (100, -18), (200, -10), (350, 1), (600, -4.5), (1500, -8), (4000, -59)]


def air_and_outside():
    front = undo_db(-55.5) * colour(rng.standard_normal(N), AIR_TONE)
    side = undo_db(-62) * colour(rng.standard_normal(N), SIDE_AIR_TONE)
    outside_db = np.interp(np.arange(N) / SR, *np.transpose(OUTSIDE_SWELL))
    side += undo_db(outside_db + 2.0 * drift(11.0)) * colour(rng.standard_normal(N), OUTSIDE_TONE)
    return front, side


def scene():
    front, side = sweeping()
    pebbles = grit() + scuffs()
    head_taps = taps()
    hits = head_taps + pebbles
    live = np.arange(N) < FAST_FROM_S * SR
    sent = (front + undo_db(6.0) * head_taps + undo_db(4.5) * pebbles) * live

    thin = signal.butter(2, 3200., "high", fs=SR, output="sos")
    echo = shed(sent)
    side += signal.sosfilt(thin, undo_db(-7.5) * hits) * np.sign(drift(83))
    side += live * (undo_db(-17.5) * signal.sosfilt(thin, echo) + undo_db(-33.0) * echo)
    walls = boom()
    side += undo_db(-45) * np.roll(walls, 240)
    front = dulling_top(front + hits + walls + live * undo_db(-12.0) * shed(sent))

    air_front, air_side = air_and_outside()
    front += air_front
    side += air_side
    side += undo_db(-20.5) * (front - 0.31 * np.roll(front, 24)) * np.sign(drift(12.)) * ~live
    front, side = np.array([front, side]) + lens_motor()
    return np.array([front + side, front - side])


def low_pass(x):
    return signal.sosfilt(signal.butter(12, 16480, fs=SR, output="sos"), x)


def record(dry):
    bass_cut = signal.butter(2, 45., "high", fs=SR, output="sos")
    top_cut = signal.cheby2(10, 60, 16900, fs=SR, output="sos")
    mix = signal.sosfilt(np.vstack([bass_cut, top_cut]), dry)
    return low_pass(mix)


dry = scene()
out = record(dry)
wrap_up_sound(out)
```